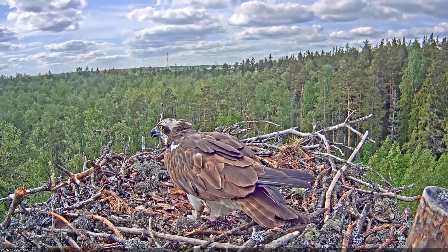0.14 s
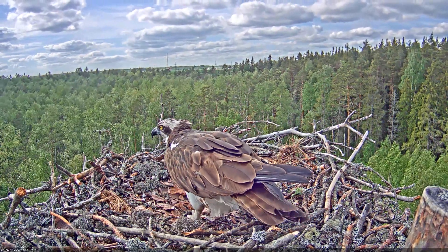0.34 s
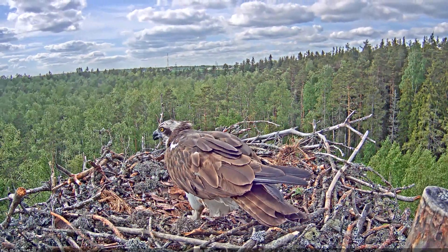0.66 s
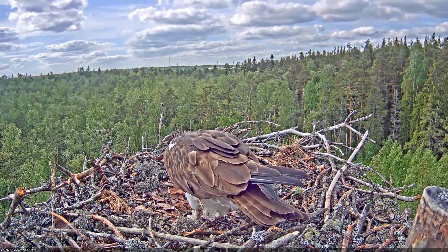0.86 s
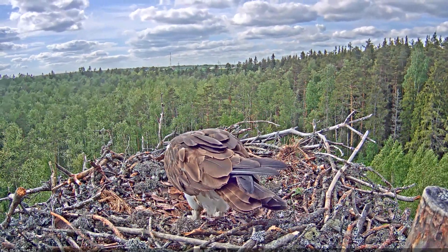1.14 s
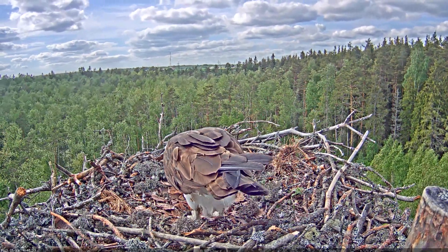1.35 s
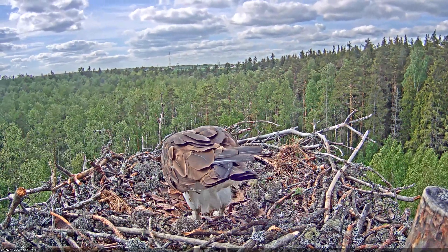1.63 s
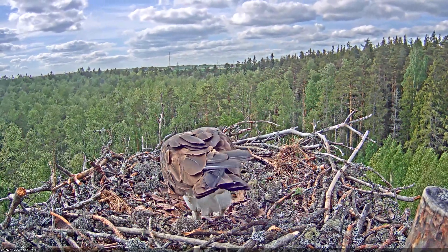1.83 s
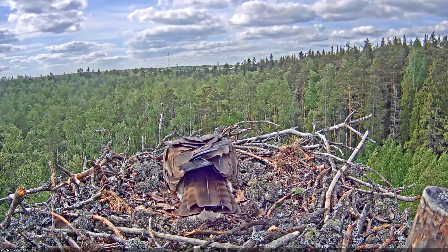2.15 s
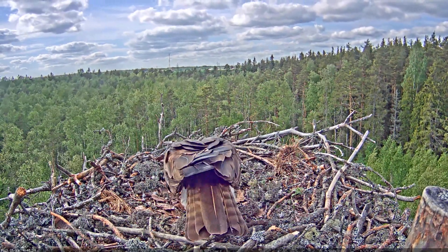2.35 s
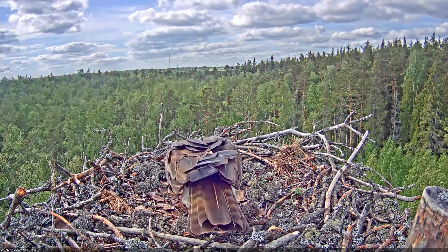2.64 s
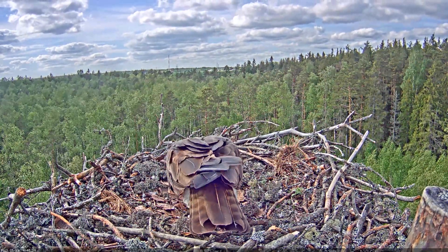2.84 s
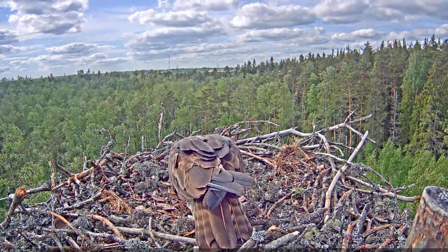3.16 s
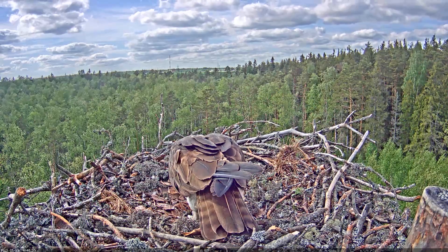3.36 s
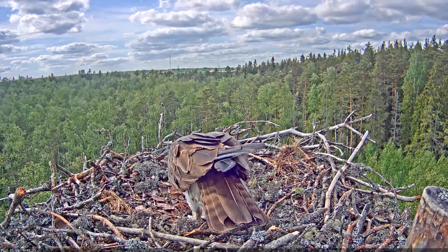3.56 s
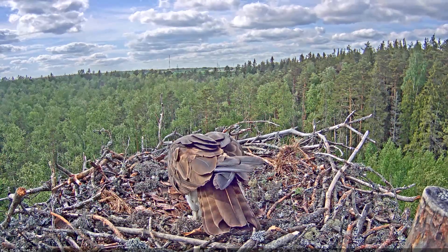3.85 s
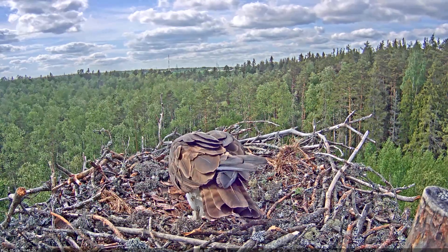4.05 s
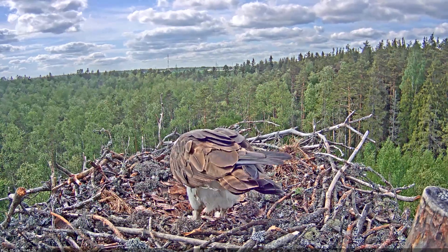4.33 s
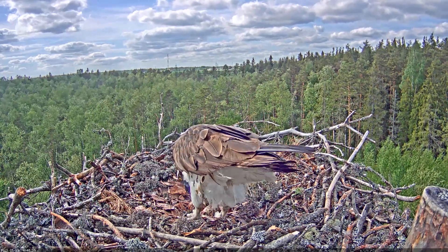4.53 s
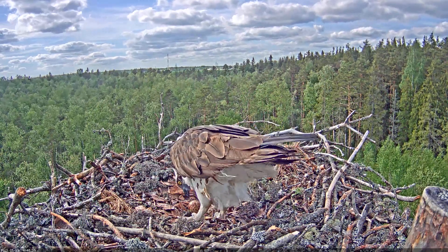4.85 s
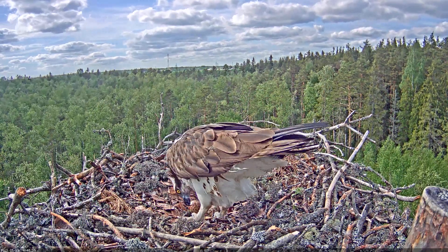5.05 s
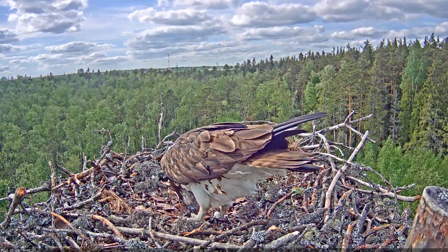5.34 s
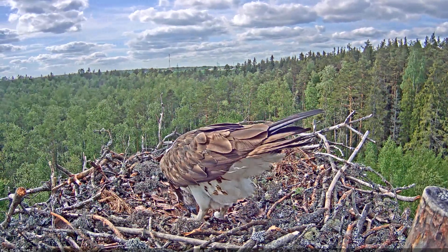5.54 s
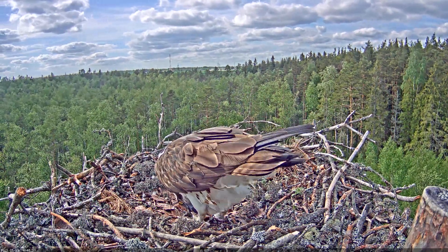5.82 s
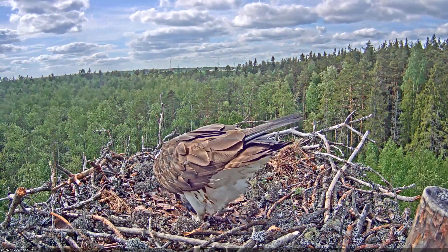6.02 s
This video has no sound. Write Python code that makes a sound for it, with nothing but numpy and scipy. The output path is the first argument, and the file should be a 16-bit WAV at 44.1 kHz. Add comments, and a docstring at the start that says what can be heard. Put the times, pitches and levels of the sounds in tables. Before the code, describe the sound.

An osprey gives four short, falling whistled chirps over low wind buffeting, a steady forest rush and faint distant songbirds.

```python
"""A forest rushes steadily while small birds whistle faintly far below an osprey's treetop nest.
After an opening puff the wind calms; then its eddies buffet the microphone more and more.
From about 1.5 s, nest sticks rub as the osprey shifts its feet, and two faint low hums pass.
The osprey gives four short falling chirps, whistled by the two sides of its syrinx;
the last one, just after 6 s, throbs and sounds harsh."""
import sys
import numpy as np
from scipy import signal
from scipy.fft import rfft, irfft
from scipy.io import wavfile
from scipy.ndimage import uniform_filter1d

SR = 44100
rng = np.random.default_rng(int(sys.argv[2]) if len(sys.argv) > 2 else 0)


def materialize(psi):
    """Save the field psi as 16-bit PCM at rate SR to the path in sys.argv[1].

    A 1-D psi becomes a single channel; in a 2-D psi each row is a channel.
    """
    bounded = np.clip(np.atleast_2d(psi).T, -1, 1)
    quanta = np.round(bounded * 32767).astype(np.int16)
    wavfile.write(sys.argv[1], SR, quanta)


N = 272979

# Each row: start in seconds, length in seconds, level in dB, first and last pitch in Hz, rise and fall
# in seconds, second voice's relative level in dB, its distance above the first in Hz, rasp from
# 0 to 1, octave overtone's relative level in dB.
OSPREY_CHIRPS = [(1.707, 0.053, -30.5, 1966, 1770, 0.0032, .010, -40, 422, 0.1, -32),
                 (3.8978, 0.035, -37, 1976, 1837, .003, 0.016, -19, 332, 0.32, -34),
                 (5.458, 0.054, -24, 2058, 1730, 0.0049, 0.019, -25.5, 445, 0.04, -36.5),
                 (6.157, 0.046, -26.5, 2310, 1896, 0.044, 0.01, -11.5, 376, 0.67, -32)]
def osprey_chirp(length, db, start_hz, end_hz, rise, fall, second_db, apart_hz, rasp, octave_db,
                 throb_hz=172, swell_db=3, third_db=-47.0, sum_tone_db=-21):
    """Nonlinear mixing: the syrinx's two voices yield overtones and a sum tone, shaped by the throat."""
    t = np.arange(round(length * SR)) / SR
    u = t / length
    attack = np.sin(np.pi / 2 * np.minimum(t / rise, 1))
    release = np.sin(np.pi / 2 * np.minimum((length - t) / fall, 1))
    effort = attack * release * amp(-swell_db * (2 * u - 1) ** 2)
    hz = (start_hz + (end_hz - start_hz) * u) * (1 + 0.0023 * waver(len(t), 300))
    # Each throb raises pitch and amplitude together, which is heard as rasp.
    throb = phase_of(throb_hz * (1 + 0.15 * waver(len(t), 100)))
    first = phase_of(hz) + rasp * np.sin(throb)
    # The weaker voice is unsteady, which gives a hoarse edge.
    second = first + phase_of(apart_hz * (1 + 0.32 * waver(len(t), 290)))
    voices = np.sin(first) * (1 + 0.39 * rasp * np.cos(throb)) + amp(second_db) * np.sin(second)
    # Upper partials flare as they glide through the throat's resonance.
    throat = dict(centre_hz=5850, half_width_hz=190, peak_db=22.4)
    third_gain = amp(third_db + resonance_db(3 * hz, **throat))
    sum_gain = amp(second_db + sum_tone_db + resonance_db(3 * hz + apart_hz, **throat))
    partials = (amp(octave_db) * np.sin(2 * first)
                + third_gain * np.sin(3 * first)
                + sum_gain * np.sin(2 * first + second))
    return np.sqrt(2) * amp(db) * effort * (voices + effort * partials)


# Each row: time of the peak in seconds, length in seconds, lift in dB.
WIND_GUSTS = [(.08, 0.23, 6), (2.5, 0.48, 6), (3.286, 0.25, 7.5), (4.02, 0.27, 7), (4.963, .24, 9)]
def gust_lift_db(rise_share=0.44):
    """Amplitude modulation: each gust smoothly lifts the wind's level and lets it fall back."""
    lift = np.zeros(N)
    for peak, length, db in WIND_GUSTS:
        u = np.linspace(0, 1, round(length * SR))
        swell = np.sin(np.pi * np.interp(u, [0, rise_share, 1], [0, .5, 1])) ** 2
        add(lift, peak - rise_share * length, db * swell)
    return lift


# Each row: frequency in Hz, relative spectral density of the eddies in dB.
EDDY_SPECTRUM = [(3, -4.5), (9, 2.5), (16, 2.5), (26, -5), (40, -8), (55, -19), (75, -23.5), (100, -29),
                 (160, -39.5), (300, -61.5), (900, -78), (4000, -140)]
# Each row: time in seconds, level of the 20-110 Hz band in dB before gusts are added.
WIND_LEVELS = [(0.0, -40.5), (0.4, -50.5), (1.15, -49), (1.5, -42.5), (2.2, -44.5), (2.45, -39.5),
               (4.4, -36.5), (5.4, -33), (5.75, -38.5), (6.19, -39)]
def wind_buffet(steadiness=0.75, lumpy_db=1.5, small_eddy_hz=50):
    """Turbulent pressure: eddies push on the microphone, and gusts stir up the small ones most."""
    eddies = noise(N, lambda f: amp(spectrum_db(EDDY_SPECTRUM, f)))
    power = uniform_filter1d(uniform_filter1d(eddies ** 2, size=SR // 8), size=SR // 16)
    eddies = eddies / power ** (steadiness / 2)  # evens out most chance swells
    eddies = eddies / band_rms(eddies, 20, 110)
    small = signal.sosfiltfilt(signal.butter(2, small_eddy_hz, "high", fs=SR, output="sos"), eddies)
    large = eddies - small
    gust_db = gust_lift_db()
    strength = amp(follow(WIND_LEVELS) + gust_db + lumpy_db * waver(N, 5))
    return strength * (large + small * amp(0.08 * gust_db))


# Each row: start in seconds, length in seconds, level in dB, centre frequency in Hz.
STICK_RUSTLES = [(1.552, 0.05, -48.5, 680), (2.741, 0.025, -48.5, 920), (4.349, 0.037, -55, 1500),
                 (6.133, 0.037, -46, 1040)]
def stick_rustle(length, db, centre_hz, sharpness=2.05):
    """Friction: dry sticks rub, making a dull band of noise that starts fast and dies away."""
    u = np.linspace(0, 1, round(length * SR))
    scrape = noise(len(u), lambda f: 1 / (1 + (sharpness * np.log((f + 1) / centre_hz)) ** 4))
    envelope = np.minimum(10 * u, 1) * (1 - u)
    return amp(db) * unit(scrape * envelope)


# Each row: start in seconds, length in seconds, level in dB before the loss through the forest,
# first, middle and last pitch in Hz, warble as a share of the pitch.
SONGBIRD_NOTES = [(.055, 0.02, -44.5, 1230, 1204, 1180, .002),
                  (0.771, 0.16, -57.5, 2490, 2874, 2920, 0.032),
                  (0.876, 0.18, -57.5, 3165, 3380, 3290, 0.051),
                  (0.982, 0.2, -56.5, 3400, 2900, 2790, 0.066), (1.358, 0.089, -62, 5380, 5470, 5490, .003),
                  (1.363, 0.04, -63, 4300, 4360, 4300, .003), (1.485, 0.048, -62, 4100, 4400, 4500, .004),
                  (1.685, 0.14, -58, 2750, 3030, 3680, 0.016), (3.825, .045, -63, 5600, 5510, 5400, .003),
                  (4.011, 0.046, -55.5, 2270, 2510, 2840, .025),
                  (4.072, 0.037, -49.5, 2690, 2430, 2300, 0.014),
                  (4.109, 0.029, -48, 2260, 2050, 1920, 0.016), (4.168, 0.067, -65, 3820, 3650, 3630, .002),
                  (5.596, .032, -64, 6350, 6400, 6520, .003)]
def songbird_note(length, db, start_hz, middle_hz, end_hz, warble):
    """Frequency modulation: a small bird's whistle warbles at random about a parabolic glide."""
    u = np.linspace(0, 1, round(length * SR))
    glide_hz = np.polyval(np.polyfit([0, .5, 1], [start_hz, middle_hz, end_hz], 2), u)
    hz = glide_hz * (1 + warble * waver(len(u), 200))
    return amp(db) * tapered_tone(hz)


# Each row: start in seconds, length in seconds, level in dB, pitch in Hz.
FAR_HUMS = [(1.55, 0.496, -58.5, 205.2), (2.65, 0.55, -58, 194.7)]
def far_hum(length, db, hz):
    """A nearly pure tone: low and slightly unsteady in pitch, it swells and fades."""
    drift = 0.0061 * waver(round(length * SR), 19)
    return amp(db) * tapered_tone(hz * (1 + drift))


# Each row: frequency in Hz, relative spectral density of rush and hiss in dB.
FOREST_SPECTRUM = [(20, 15), (120, 3), (300, 0.5), (450, 0), (680, 1.5), (1200, -3.5), (1700, -2.5),
                   (2300, -14), (3100, -16.5), (4400, -24.5), (6000, -26), (7200, -31.5), (8600, -35),
                   (13800, -39.5)]
# Each row: resonant frequency of the microphone's housing in Hz, half width in Hz, lift in dB.
HOUSING_RESONANCES = [(5705, 440, 6), (9970, 560, 12.5)]
# Each row: time in seconds, level of the rush between 300 and 1500 Hz in dB.
RUSH_LEVELS = [(0.0, -50), (0.32, -51), (3.29, -48), (5.79, -49), (6.1, -47.5)]
# Each row: time in seconds, level of the hiss between 7 and 12 kHz in dB.
HISS_LEVELS = [(0.0, -67.5), (2.2, -67.5), (4.8, -70.5), (6.1, -70.5)]
def forest_rush(split_hz=3000, flutter_db=0.47):
    """Broadband noise: leaves and needles rush in the breeze, with the microphone's hiss above them."""
    def colour(f):
        housing_db = sum(resonance_db(f, *row) for row in HOUSING_RESONANCES)
        return amp(spectrum_db(FOREST_SPECTRUM, f) + housing_db)
    rush = noise(N, lambda f: colour(f) / np.sqrt(1 + (f / split_hz) ** 4))
    hiss = noise(N, lambda f: colour(f) / np.sqrt(1 + (split_hz / (f + 1)) ** 4))
    rush *= amp(follow(RUSH_LEVELS) + flutter_db * waver(N, 13)) / band_rms(rush, 300, 1500)
    hiss *= amp(follow(HISS_LEVELS)) / band_rms(hiss, 7000, 12000)
    return rush + hiss


def tree_echo(x, t60, returns_per_s=2000):
    """Scattering: the trees send back many reflections, which decay by 60 dB in t60 seconds."""
    t = np.arange(SR) / SR
    returns = rng.standard_normal(SR) * (rng.random(SR) < returns_per_s / SR) * (t > .004)
    tail = returns * amp(-60 * t / t60)
    return signal.fftconvolve(x, tail / np.linalg.norm(tail))[:N]


def resonance_db(hz, centre_hz, half_width_hz, peak_db):
    """Resonance: a bell-shaped lift in dB around a centre frequency."""
    return peak_db / (1 + ((hz - centre_hz) / half_width_hz) ** 2)


def phase_of(hz):
    """Phase is the time integral of angular frequency."""
    return 2 * np.pi * np.cumsum(hz) / SR


def tapered_tone(hz):
    """A sinusoid of rms 1 that follows a pitch curve, fading in and out."""
    return unit(np.sin(phase_of(hz)) * signal.windows.tukey(len(hz), .5))


def noise(size, gain):
    """Spectral shaping: white noise weighted by gain(Hz), at rms 1."""
    hz = np.fft.rfftfreq(size, 1 / SR)
    return unit(irfft(rfft(rng.standard_normal(size)) * gain(hz), size))


def waver(size, hz):
    """Random fluctuation of rms near 1, rolling off above the given rate."""
    return noise(size + SR // 4, lambda f: 1 / (1 + (f / hz) ** 4))[:size]


def band_rms(x, lo, hi):
    """Parseval's theorem gives the rms between two frequencies."""
    hz = np.fft.rfftfreq(len(x), 1 / SR)
    band = rfft(x)[(hz > lo) & (hz < hi)]
    return np.sqrt(2 * np.sum(abs(band) ** 2)) / len(x)


def amp(db):
    """Decibels to amplitude ratio."""
    return 10 ** (np.asarray(db) / 20)


def unit(x):
    """Normalisation to rms 1."""
    return x / np.sqrt(np.mean(x ** 2) + 1e-20)


def spectrum_db(points, hz):
    """Interpolation of a spectrum on a log-frequency axis."""
    f, db = np.transpose(points)
    return np.interp(np.log(hz + 1), np.log(f + 1), db)


def follow(curve):
    """Linear interpolation of a time curve at every sample."""
    return np.interp(np.arange(N) / SR, *np.transpose(curve))


def add(mix, start, sound):
    """Adds a sound from its start in seconds, or from zero if that is negative."""
    part = mix[max(round(start * SR), 0):][:len(sound)]
    part += sound[:len(part)]


def play(source, rows):
    """Sounds a source once for each row of its table."""
    mix = np.zeros(N)
    for start, *row in rows:
        add(mix, start, source(*row))
    return mix


def scene():
    """Superposition: the near osprey is almost dry; the far songbirds carry more reverberation."""
    osprey = play(osprey_chirp, OSPREY_CHIRPS)
    song = play(songbird_note, SONGBIRD_NOTES)
    near = osprey + amp(-35) * tree_echo(osprey, t60=.35) + play(stick_rustle, STICK_RUSTLES)
    far = amp(-3.0) * song + amp(-9.5) * tree_echo(song, t60=0.53) + play(far_hum, FAR_HUMS)
    return (near + far + wind_buffet() + forest_rush())[None]


def record(dry, cutoff_hz=13900, offset=.0216):
    """Band limiting: a steep low-pass cuts the top treble; the converter adds a constant offset."""
    low_pass = signal.firwin(1023, cutoff_hz, window=("kaiser", 9), fs=SR)
    return signal.oaconvolve(dry, low_pass[None], "same") + offset


dry = scene()
out = record(dry)
materialize(out)
```